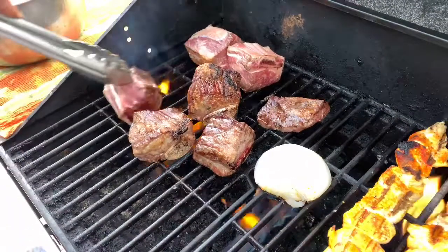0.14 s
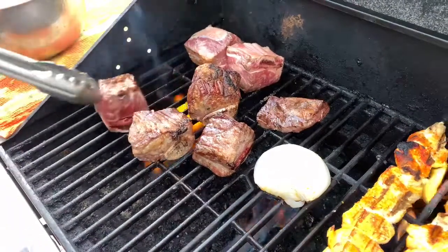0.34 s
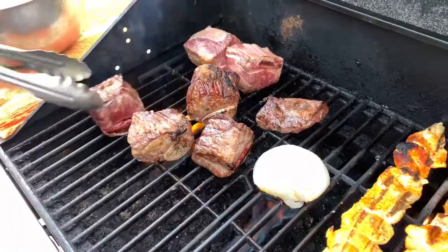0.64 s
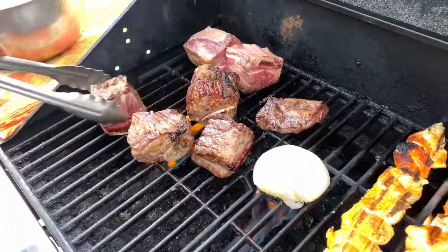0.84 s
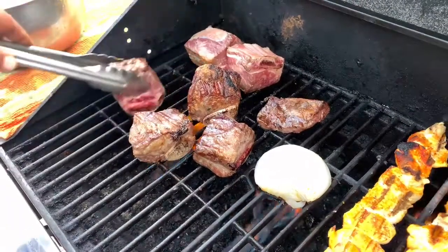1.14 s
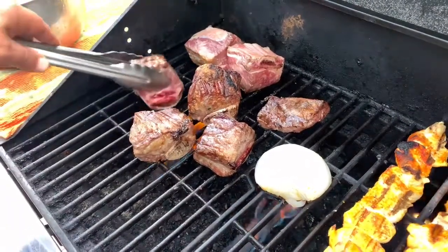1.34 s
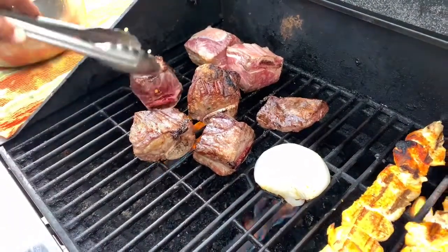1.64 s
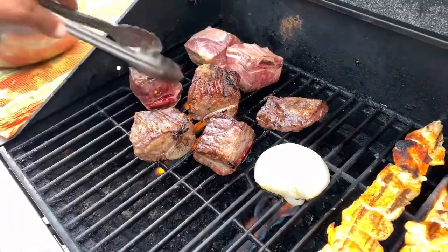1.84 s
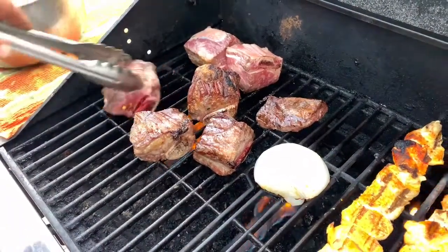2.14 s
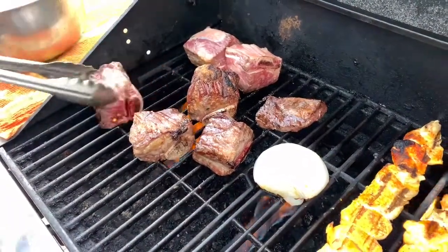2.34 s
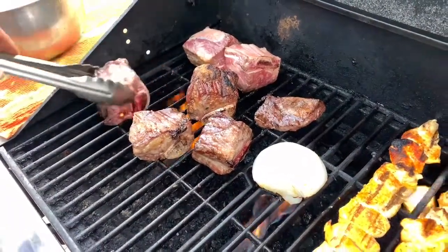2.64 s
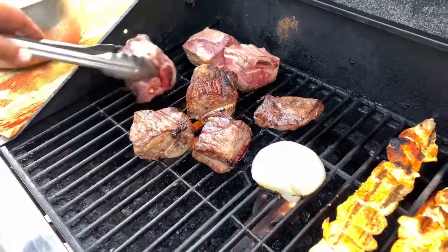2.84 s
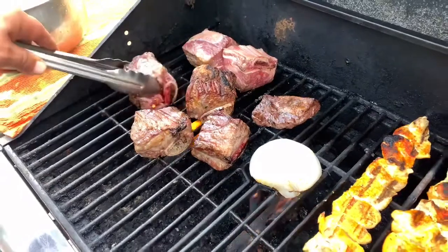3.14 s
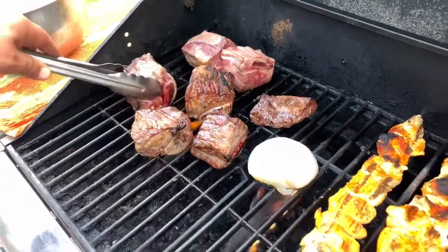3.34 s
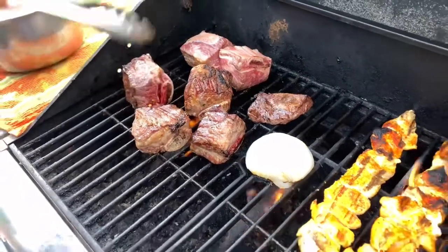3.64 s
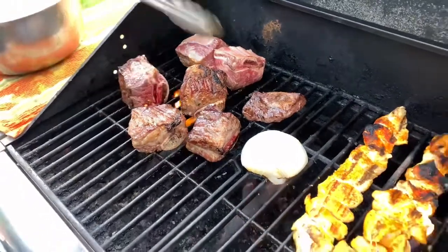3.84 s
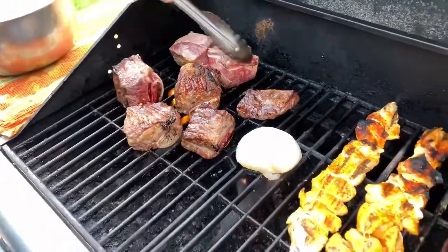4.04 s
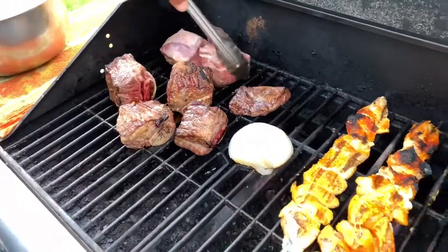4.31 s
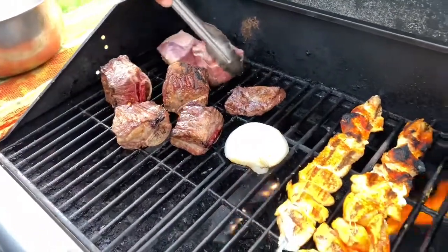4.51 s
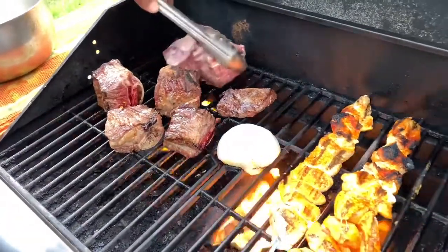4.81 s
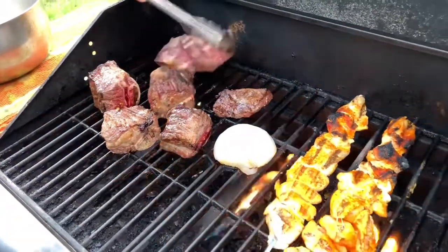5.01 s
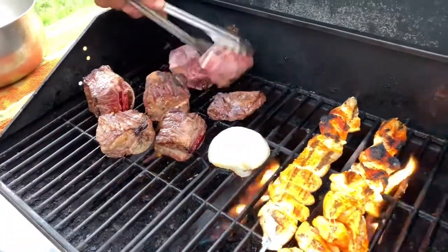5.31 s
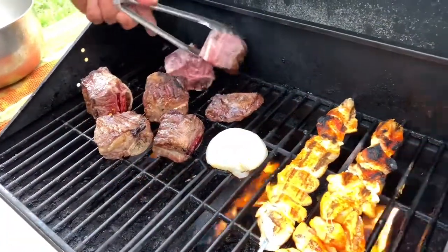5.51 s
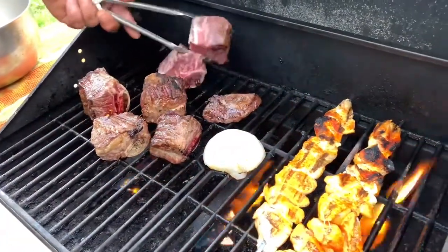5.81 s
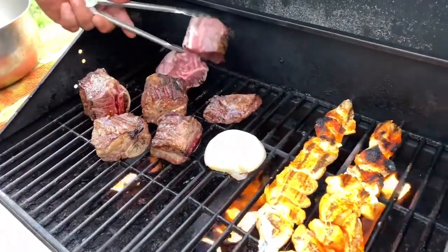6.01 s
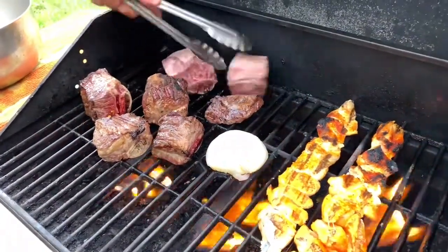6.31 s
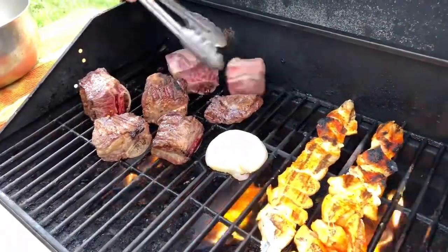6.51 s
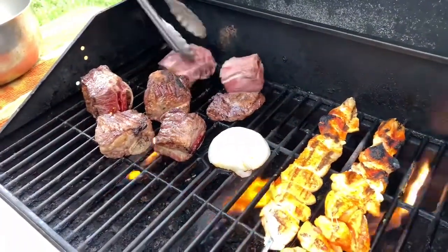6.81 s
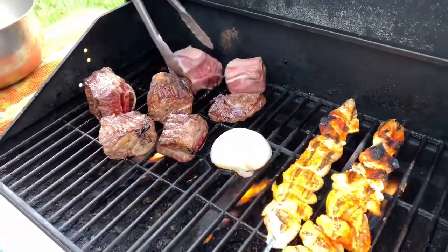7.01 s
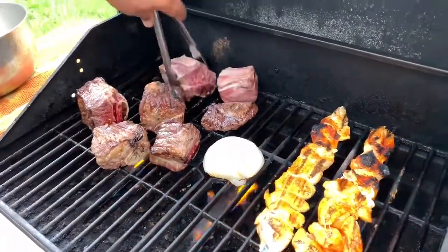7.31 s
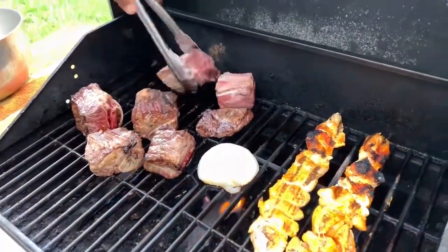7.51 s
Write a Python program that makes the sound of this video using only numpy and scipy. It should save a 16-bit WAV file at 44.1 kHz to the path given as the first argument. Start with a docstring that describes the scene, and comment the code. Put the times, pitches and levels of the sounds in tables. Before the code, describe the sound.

Meat sizzles and spits on an outdoor gas grill over a low burner roar, while metal tongs knock and scrape the grate and wind puffs.

```python
"""Meat sizzles on an outdoor gas grill, over a low hum and the burners' turbulent roar.
It opens with fizzing fat, spits, a knock and small puffs of wind; knocks and a few tong scrapes follow.
Past four seconds wind buffets the microphones and the crackle and low roar dip; then the crackle grows.
Blows of the tongs, scrapes, rubbing meat and gusts crowd the last three seconds, with loud spits at the end.
Fat is random bursts of noise, metal is struck resonance, and air is filtered noise and swept swings."""
import sys
import numpy as np
from scipy import signal
from scipy.fft import rfft, irfft, next_fast_len
from scipy.io import wavfile
from scipy.ndimage import uniform_filter1d, map_coordinates

SR = 44100
rng = np.random.default_rng(int(sys.argv[2]) if len(sys.argv) > 2 else 0)


def waveform_to_disk(signal):
    """Save audio, clipped to [-1, 1], as 16-bit WAV at the path in sys.argv[1]."""
    frames = np.transpose(np.atleast_2d(signal))
    scaled = np.clip(frames, -1, 1) * 32767
    samples = np.round(scaled).astype(np.int16)
    wavfile.write(sys.argv[1], SR, samples)


N = 337806

# Low hum: (frequency [Hz], level [dB])
HUM_TONES = [(64.8, -47.5), (118.5, -53)]
# Spectrum of the burners' rumble: (frequency [Hz], density [dB per Hz])
RUMBLE_SPECTRUM = [(15, -14), (28, -35), (48, 1.5), (85, -6.5), (140, -5), (200, -15.5), (320, -83),
                   (700, -39)]
# Spectrum of the burners' rush: (frequency [Hz], density [dB per Hz])
RUSH_SPECTRUM = [(80, -3.5), (170, 9.5), (265, 1), (350, -4), (430, -7), (500, -8.5), (620, -5.5),
                 (800, -16.5), (1200, -17.5), (2000, -22.5), (3200, -20), (8000, -39)]
# Likeness of the two microphone ports in diffuse sound: (frequency [Hz], coherence [-1 to 1])
PORT_COHERENCE = [(60, 0.95), (280, 1), (480, 0.95), (700, 0.4), (1000, 0.15), (1450, 0.34), (1900, 1),
                  (2300, 0.43), (3100, -0.62), (4000, 0.052), (4500, -0.81), (5400, -0.34), (7500, -.8)]
# Level difference of the ports, right minus left: (frequency [Hz], difference [dB])
RIGHT_OVER_LEFT = [(280, 0), (500, 0), (700, 3.5), (1200, 0.3), (1800, 2.5), (3000, .5), (5500, 7.5),
                   (8000, -3.5)]
# Phase by which the left port leads the right: (frequency [Hz], lead [rad])
LEFT_PHASE_LEAD = [(250, -0.22), (500, -0.87), (720, 2.74), (850, 0.52), (1050, 1.28), (1600, 0.088),
                   (1900, 0.63)]
# Brief dip in level: (time [s], share of the full depth in dB [0-1]); the end shares hold outward
DIP_SHAPE = [(4.315, 0.069), (4.39, 0.55), (4.47, 1), (4.69, 0.42), (4.73, 0.16)]
# Spells of breeze: (time [s], level [dB], length [s])
GUST_SPELLS = [(3.904, -37.5, 0.32), (4.289, -32.5, 0.096), (5.183, -38, 0.5), (6.447, -36.5, 0.47)]
# Strongest eddies at the microphones: (time of peak [s], level before a common trim [dB], mean pitch [Hz])
EDDIES = [(0.126, -28.5, 218.5), (0.222, -26.5, 171.5), (0.292, -30, 127.7), (0.455, -32.5, 118.5),
          (3.556, -29, 68), (4.312, -33, 139), (4.336, -29, 150), (4.354, -27, 240), (4.372, -20, 125.3),
          (4.389, -22, 112.2), (4.418, -23.5, 190), (4.457, -43, 428), (4.468, -29, 159.2),
          (4.677, -34, 140.6), (5.028, -28.5, 67), (5.255, -20, 134.7), (5.285, -27.5, 81.5),
          (5.421, -22, 67.5), (5.592, -21, 159.4), (5.605, -26, 80.2), (5.635, -27, 217.9), (5.65, -27, 79),
          (5.674, -30, 80.2), (6.373, -30, 183.3), (6.486, -27.5, 82.4), (6.594, -21, 104.3),
          (6.645, -21.5, 94), (6.717, -25.5, 99), (6.806, -24, 100.5), (6.894, -30, 84.2),
          (7.009, -29.5, 111), (7.055, -25, 112.3), (7.558, -26, 74.4)]
# Soft meat slides over the bars: (time [s], level [dB], length [s])
MEAT_RUBS = [(0.01, -51.5, 0.17), (2.47, -47, 0.15), (4.852, -46.5, 0.11), (5.08, -40, 0.13),
             (6.013, -45, 0.18), (6.25, -45.5, 0.12)]
# Ringing modes of grate and firebox: (frequency [Hz], relative level [dB], t60 [s])
GRATE_MODES = [(257.7, 5, 0.18), (476, 0, 0.092), (522, -8.5, 0.24), (691, 4, 0.12), (757, -1.5, 0.22),
               (785, -3, 0.41), (869, -3.5, 0.3), (935, -7, 0.24), (999, -2, 0.19), (1076, 0, 0.03),
               (1204, -2, 0.076), (1371, 3.5, 0.17), (1560, -4, 0.17), (1865, -1.5, 0.11), (2109, 7, 0.07),
               (2270, -4, 0.15)]
# Dense rattle of the sheet metal: (frequency [Hz], density [dB per Hz])
SHEET_SPECTRUM = [(100, 3), (250, 8.5), (350, -4), (500, 2), (1200, 5.5), (1680, 1.5), (2000, 0.5),
                  (2500, -8), (3300, -1), (5000, -7), (12000, -24)]
# Tongs or meat knock on the grate: (time [s], level [dB], time to let go [s], brightness [Hz],
# note of the touched bar [Hz], share of that bar [dB])
GRATE_KNOCKS = [(.122, -42.5, 0.0096, 2250, 1420, 5), (1.297, -35.5, 0.028, 1510, 513, -3),
                (1.345, -42.5, 0.024, 1200, 760, -2), (2.228, -38.5, 0.038, 324, 263, 18),
                (4.005, -45.5, 0.0033, 3370, 2150, -4), (4.708, -45, 0.056, 2050, 1660, -12),
                (5.109, -31, 0.027, 1170, 510, -1.5), (5.693, -35, 0.033, 2020, 1400, -23.5),
                (6.004, -41.5, 0.033, 1580, 790, -16), (6.366, -40, 0.016, 810, 248, 4),
                (6.831, -27, 0.032, 1820, 1150, -2), (7.188, -35.5, 0.047, 1370, 518.4, -13),
                (7.233, -34, 0.05, 2120, 1134, -2)]
# Tongs drag on the grate: (time [s], level before a common trim [dB], length [s], brightness [Hz],
# note of the touched bar [Hz], share of that bar [dB])
TONG_SCRAPES = [(0.008, -44, 0.01, 2380, 2190, -9), (.11, -49, 0.027, 2300, 2110, 6),
                (0.282, -46, 0.013, 900, 296, -2), (0.438, -49.5, 0.009, 1300, 1100, -3),
                (2.309, -48.5, 0.011, 2200, 2200, -7), (2.368, -48, 0.034, 2200, 2050, -8),
                (2.401, -40.5, 0.012, 2100, 1830, -5), (2.422, -37.5, 0.013, 2200, 750, -2),
                (2.461, -36.5, 0.026, 2270, 1834, -8), (2.503, -40, .006, 1100, 270, 1),
                (2.537, -50, 0.056, 1800, 1770, -8), (4.758, -43.5, 0.016, 1360, 900, -9),
                (4.931, -40.5, 0.012, 1100, 243, 8), (5.135, -43.5, 0.017, 1310, 1220, -3),
                (5.505, -57, 0.0074, 790, 493, 1), (6.006, -38.5, 0.073, 1490, 1550, -12),
                (6.111, -42, 0.017, 1700, 2320, -3), (6.135, -41.5, 0.02, 1350, 676, 7),
                (6.25, -35.5, 0.025, 1450, 960, -12), (6.34, -45, 0.008, 1200, 660, -24),
                (7.152, -45, 0.021, 1450, 533, -3), (7.264, -38.5, 0.012, 1450, 1430, -8)]
# Bare steel strikes or grazes a bar: (time [s], level [dB], rise [s], fade [s])
STEEL_CLINKS = [(.002, -45, 0.005, 0.037), (0.136, -57, .01, .02), (0.729, -42, 0.0055, 0.011),
                (1.301, -47, .003, 0.013), (2.409, -43, 0.024, .025), (2.452, -37, 0.03, 0.009),
                (6.02, -44, .015, 0.07), (6.176, -49, 0.0024, .005), (6.2, -44.5, .008, .015),
                (6.315, -52, .002, 0.0045), (7.231, -29.5, 0.0037, 0.014), (7.235, -31, 0.0013, .004)]
# Ringing modes of the tongs' arms: (frequency [Hz], relative level [dB], t60 [s])
STEEL_MODES = [(1770, 1, .06), (2120, -1, 0.064), (2500, -10, 0.044), (2610, -1, .06), (2970, -3, 0.24),
               (3090, 3, 0.064), (3200, 6, .06), (3830, 5, 0.084), (3810, -15, 0.041), (4270, 1, 0.035)]
# Grit of steel on iron: (frequency [Hz], density [dB per Hz])
GRIT_SPECTRUM = [(500, -22), (1900, 7.5), (2700, 3), (4500, -3.5), (6500, -0.5), (12000, 0)]
# Spectrum of the fizz: (frequency [Hz], density [dB per Hz])
FIZZ_SPECTRUM = [(3000, -29), (6000, -16.5), (7200, -8.5), (8300, 1.5), (9800, 3), (11600, -3),
                 (14000, 5.5), (15600, 1), (16200, -3.5)]
# Spectrum of the crackle: (frequency [Hz], density [dB per Hz])
CRACKLE_SPECTRUM = [(600, -2.5), (1500, 2), (2100, 0.5), (2700, 5), (3600, 0), (4600, 4), (5600, -1),
                    (7000, 10), (9000, -10.5), (15000, -32)]
# Juice runs onto the hot bars: (time [s], level before the fizz trim [dB], hold [s])
FRYING_FLARES = [(-.04, -39.5, 0.2), (0.18, -43, 0.36), (1.753, -46.5, 0.066), (2.373, -49, 0.19),
                 (3.027, -50.5, 0.18), (3.787, -48.5, 0.44), (4.242, -43, 0.081), (4.7, -43, 0.014),
                 (5.144, -38.5, 0.85), (6.713, -47, 0.54), (7.15, -44.5, 0.22)]
# Loud spits of fat: (time [s], level before a common trim [dB], crackle against fizz [dB])
LOUD_SPITS = [(.058, -25.5, -8), (.492, -33, -3), (.603, -24.5, -10), (.879, -33.5, -4), (1.036, -25, -9),
              (1.753, -30, -18), (1.767, -32, -18), (2.682, -34, -12), (2.816, -29, -11), (3.858, -37, -3),
              (3.917, -32, -7), (4.142, -26, -9), (4.151, -33, -9), (5.143, -26.5, -7), (5.179, -30, -3),
              (5.229, -19.5, -11), (5.389, -35, -8), (5.513, -26, -22), (5.873, -26, -4), (6.175, -32, -1),
              (6.554, -37, 7.5), (6.969, -35.5, 6), (7.177, -25, -13), (7.235, -18.5, -16),
              (7.348, -24, -9), (7.418, -22.5, -14)]
# Echo paths from the back wall and the lid: (mean delay [s])
WALL_ECHOES = [0.000903, .0023]

PORT_LAG_MS = 0.215  # the left port hears the grate this much later
EDGE_HZ = 15900
DIP_CRACKLE_DB, DIP_LOW_DB = -20, -12  # full depths of the dip
HOLLOW_WIDTH_HZ = 23.5  # half width of the firebox resonances under the flames

GUST_RISE_S, GUST_FADE_S = 0.052, 0.072
# A gust of the usual level reaches this high; a stronger one reaches higher, in dB of reach per dB
GUST_USUAL_DB, GUST_REACH_HZ, REACH_FOLLOWS = -35.5, 100, 0.65
PUFF_SWINGS = 1.07  # pressure swings from an eddy's peak to its edge: small eddies pass quickly

RUB_RISE_S, RUB_FADE_S = 0.016, 0.16
SCRAPE_RISE_S, SCRAPE_FADE_S = 0.0032, 0.042
KNOCK_RISE_S = 0.0017  # time to full force
CHATTER_PER_S, CHATTER_UNEVEN, CHATTER_SAG_DB = 85, 0.3, -8.5  # bounces of the grate after a knock
TICK_DB, TICK_S, TICK_BRIGHTER = -7, 0.0046, 0.68  # first touch; the last scales the blow's brightness

SIMMER_DB, FLARE_RISE_S, FLARE_FADE_S = -51.5, 0.025, 0.034  # steady frying; shape of every flare
AFTER_DB, AFTER_FADE_S = -3.5, 2.54  # the last of the juice cooks off slowly
CRACKLE_DB, CRACKLE_FOLLOWS = -56, 0.77  # crackle at a simmer, and its dB per dB of frying
FLAME_UP_S, FLAME_UP_RISE_S, FLAME_UP_DB = 4.86, 0.36, 3.5  # dripping fat catches fire: more crackle
POP_DB, POP_FOLLOWS, POP_SPREAD_DB = -63.5, 0.73, 1  # level at a simmer, dB per dB, spread in size
POPS_PER_S, POP_LOW_HZ, POP_HIGH_HZ = 380, 2120, 9360
POP_CYCLES = 2.5  # decay constant of a pop in its own cycles
POP_DRIFT_DB = 1.5  # random level drift, independent for each pop pitch
SPIT_S = 0.0059  # time constant of a spurt
SMALL_SPITS_PER_S, SMALL_SPIT_DB, SMALL_SPIT_SPREAD_DB = 22, 5, 8  # dB above the frying, and plus or minus


def amp(db):
    """Level: converts decibels to an amplitude gain."""
    return 10 ** (np.asarray(db) / 20)


def unit(x):
    """Normalization: scales to an rms of one."""
    return x / np.sqrt(np.mean(x ** 2) + 1e-20)


def peaked(pair):
    """Short-time power: scales a stereo sound so that its loudest moment has an rms of one."""
    return pair / np.sqrt(uniform_filter1d((pair ** 2).mean(0), size=900).max())


def read(points, hz):
    """Interpolation: reads a (frequency, value) table on a log-frequency axis."""
    f, value = np.transpose(points)
    return np.interp(np.log(hz + 1), np.log(f), value)


def filtered(x, response):
    """Linear filtering: multiplies the spectrum by a function of frequency."""
    size = next_fast_len(x.shape[-1] + 512)
    hz = np.fft.rfftfreq(size, 1 / SR)
    return irfft(rfft(x, size) * response(hz), size)[..., :x.shape[-1]]


def colour(x, spectrum):
    """Spectral shaping: applies a (frequency, dB) curve and gives an rms of one."""
    return unit(filtered(x, lambda hz: amp(read(spectrum, hz))))


def drift(rate):
    """Low-pass noise: slow random motion of rms one, up to about `rate` hertz."""
    coarse = rng.standard_normal(N // 100 + 1)
    hz = np.fft.rfftfreq(len(coarse), N / SR / len(coarse))
    slow = irfft(rfft(coarse) / (1 + (hz / rate) ** 4))
    return np.interp(np.arange(N), np.linspace(0, N, len(slow)), unit(slow))


def envelope(t, rise, length, fade):
    """Growth and decay: rises in a straight line, holds until `length`, then decays exponentially."""
    return np.clip(t / rise, 0, 1) * np.exp(-np.maximum(t - length, 0) / fade)


def dip(depth_db):
    """Amplitude modulation: gain of the brief dip in level."""
    return amp(depth_db * np.interp(np.arange(N) / SR, *np.transpose(DIP_SHAPE)))


def add(mix, s, sound):
    """Superposition: adds a stereo sound to the mix at time s."""
    part = mix[:, max(round(s * SR), 0):][:, :sound.shape[1]]
    part += sound[:, :part.shape[1]]


def direct(x, lag_ms=PORT_LAG_MS):
    """Arrival-time difference: sound from the grate reaches the right port first."""
    left = filtered(x, lambda hz: np.exp(-2j * np.pi * hz * lag_ms / 1000))
    return np.array([left, x])


def diffuse(pair):
    """Spatial coherence: mixes unrelated signals into a port pair with set likeness, balance and phase."""
    size = next_fast_len(pair.shape[1])
    hz = np.fft.rfftfreq(size, 1 / SR)
    a, b = rfft(pair, size)
    alike = np.clip(read(PORT_COHERENCE, hz), -1, 1)
    mid, side = a * np.sqrt((1 + alike) / 2), b * np.sqrt((1 - alike) / 2)
    # Each port takes half of the level and phase difference
    lean = amp(read(RIGHT_OVER_LEFT, hz) / 2)
    lead = np.exp(0.5j * read(LEFT_PHASE_LEAD, hz))
    ports = np.array([(mid + side) * lead / lean, (mid - side) * lean / lead])
    return irfft(ports, size)[:, :pair.shape[1]]


def off_the_walls(pair, wall_db=-7.0, sway=0.072):
    """Reflection: two near steel walls return echoes whose paths drift as the microphones sway."""
    n, out = np.arange(N), pair
    for delay_s in WALL_ECHOES:
        late = n - delay_s * SR * (1 + sway * drift(rate=1.46))
        echo = np.array([map_coordinates(port, [late], order=3) for port in pair])
        out = out + amp(wall_db) * echo
    return out


def ringing(table, t, detune, uneven_db):
    """Modal decay: at each touch the modes' pitch and share vary alike at both ports; phases differ by port."""
    hz, db, t60 = np.transpose(table)[:, :, None]
    shift, share = rng.standard_normal((2, len(table), 1))
    decay = amp(db + uneven_db * share - 60 * t / t60)
    modes = decay * np.exp(2j * np.pi * hz * (1 + detune * shift) * t)
    phases = np.exp(2j * np.pi * rng.random((2, len(table))))
    return (phases @ modes).imag


def hum(waver_hz=1.4, swell_db=3.5):
    """Frequency modulation: two low tones waver in pitch and level."""
    out = 0
    for hz, db in HUM_TONES:
        level = amp(db + swell_db * drift(rate=0.21))
        phase = 2 * np.pi * np.cumsum(hz + waver_hz * drift(rate=6.6)) / SR
        out = out + level * unit(np.sin(phase))
    return out


def burners(flutter_db=2.5, rumble_db=-45.0, rush_db=-48, flicker_db=1.5, hollow_db=-57):
    """Turbulent combustion: fluttering rumble and steadier rush, which excites firebox resonances faintly."""
    flames = diffuse(rng.standard_normal((2, N)))
    rumble = colour(flames, RUMBLE_SPECTRUM) * amp(rumble_db + flutter_db * drift(rate=2.5))
    rush = colour(diffuse(rng.standard_normal((2, N))), RUSH_SPECTRUM)

    def resonances(hz):
        """Resonance: sums a peak at each grate mode, growing with frequency."""
        return sum(hz / (1 + ((hz - f) / HOLLOW_WIDTH_HZ) ** 2) for f, db, t60 in GRATE_MODES)

    hollow = unit(filtered(rush, resonances))
    flicker = amp(flicker_db * drift(rate=16.4))
    return rumble + (amp(rush_db) * rush + amp(hollow_db) * hollow) * flicker


def breeze(low_hz=40, slope=6.8):
    """Turbulent pressure: each spell of breeze buffets the microphones with low-frequency noise."""
    out, t = np.zeros((2, N)), np.arange(N) / SR
    air = diffuse(rng.standard_normal((2, N)))
    for s, db, length in GUST_SPELLS:
        reach = GUST_REACH_HZ * amp(REACH_FOLLOWS * (db - GUST_USUAL_DB))
        buffet = filtered(air, lambda hz: (1 - 1 / (1 + (hz / low_hz) ** 4)) / (1 + (hz / reach) ** slope))
        out += amp(db) * envelope(t - s, GUST_RISE_S, length, GUST_FADE_S) * unit(buffet)
    return out


def wind(level_db=-1, wander=0.33, apart=0.027, ragged_db=-13, ragged_reach=1.6):
    """Eddy convection: a few uneven pressure swings pass, with finer turbulence different at each port."""
    out, t = np.zeros((2, N)), np.arange(-4096, 4096) / SR
    for s, db, hz in EDDIES:
        unevenness = unit(filtered(rng.standard_normal(len(t)), lambda f: 1 / (1 + (f / hz) ** 4)))
        pitch = hz * np.exp(wander * unevenness - wander ** 2 / 2)
        phase = 2 * np.pi * (np.cumsum(pitch) / SR + rng.random())
        swings = np.sin(phase + apart * rng.standard_normal((2, 1)))
        noise = rng.standard_normal((2, len(t)))
        ragged = unit(filtered(noise, lambda f: 1 / (1 + (f / (ragged_reach * hz)) ** 3)))
        passing = np.exp(-(t * hz / PUFF_SWINGS) ** 2)
        add(out, s + t[0], amp(db + level_db) * passing * (swings + amp(ragged_db) * ragged))
    return out


def rubs(low_hz=170, high_hz=340, slope=2.44, stick_db=5.0):
    """Stick-slip friction: meat slides on the bars as unevenly modulated, dull band-limited noise."""
    t = np.arange(N) / SR
    force = sum(amp(db) * envelope(t - s, RUB_RISE_S, length, RUB_FADE_S) for s, db, length in MEAT_RUBS)
    noise = diffuse(rng.standard_normal((2, N)))
    rub = filtered(noise, lambda hz: (1 - 1 / (1 + (hz / low_hz) ** 4)) / (1 + (hz / high_hz) ** slope))
    return force * unit(rub * amp(stick_db * drift(rate=20)))


def firebox(t, sheet_t60=0.21, modes_db=3.0):
    """Impulse response: a tap rings the grate modes over a dense, short rattle of sheet metal."""
    bars = ringing(GRATE_MODES, t, detune=0.01, uneven_db=1.0)
    sheet = colour(rng.standard_normal((2, len(t))), SHEET_SPECTRUM) * amp(-60 * t / sheet_t60)
    return unit(sheet) + amp(modes_db) * unit(bars)


def contact(force, bright_hz, bar_hz, bar_db, blow_db, jerky, bar_width_hz=60, bass_edge=0.054,
            dull_share=0.49, slope=2.6):
    """Contact excitation: tiny slips shake the grill and one bar; the sound dulls as the force eases."""
    t = np.arange(len(force)) / SR
    slips = force * rng.standard_normal(len(t)) * rng.exponential(1, len(t)) ** jerky
    ring = signal.fftconvolve(slips[None], firebox(t), axes=1)[:, :len(t)]
    blow = colour(force * rng.standard_normal((2, len(t))), SHEET_SPECTRUM)
    shake = unit(ring) + amp(blow_db) * blow

    def softened(edge_hz):
        """Low-pass filtering: takes off the treble above the edge."""
        return filtered(shake, lambda hz: 1 / np.hypot(1, (hz / edge_hz) ** slope))

    firm = np.sqrt(force / force.max())
    body = firm * softened(bright_hz) + (1 - firm) * softened(dull_share * bright_hz)
    # A brighter touch has less bass
    bass_hz = min(bass_edge * bright_hz, SR / 4)
    body = signal.lfilter(*signal.butter(1, bass_hz, "high", fs=SR), body)
    bar = signal.lfilter(*signal.iirpeak(bar_hz, bar_hz / bar_width_hz, fs=SR), blow)
    return peaked(diffuse(unit(body) + amp(bar_db) * unit(bar)))


def chatter(t):
    """Repeated impact: the grate bounces on its ledge, its force jumping at each bounce and then sagging."""
    pace = CHATTER_PER_S * np.exp(CHATTER_UNEVEN * drift(rate=60)[:len(t)])
    bounces = np.cumsum(pace) / SR
    return amp(CHATTER_SAG_DB * (bounces % 1))


def tongs(scrape_db=0.4, catch_db=3.0):
    """Impact and friction: a knock ticks, hits and lets go; a scrape swells, catches and trails off."""
    out, t = np.zeros((2, N)), np.arange(16384) / SR
    for s, db, fade, bright_hz, *bar in GRATE_KNOCKS:
        force = envelope(t, KNOCK_RISE_S, KNOCK_RISE_S, fade) * chatter(t)
        tick = contact(np.exp(-t / TICK_S), TICK_BRIGHTER * bright_hz, bright_hz,
                       bar_db=-2.5, blow_db=-1.5, jerky=1.3)
        hit = contact(force, bright_hz, *bar, blow_db=-5.0, jerky=1.86)
        add(out, s, amp(db) * (hit + amp(TICK_DB) * tick))
    for s, db, length, *tone in TONG_SCRAPES:
        catches = amp(catch_db * drift(rate=35)[:len(t)])
        force = envelope(t, SCRAPE_RISE_S, length, SCRAPE_FADE_S) * catches
        add(out, s, amp(db + scrape_db) * contact(force, *tone, blow_db=-12.5, jerky=1.48))
    return out


def clinks(grit_db=6.5):
    """Forced vibration: gritty slips of bare steel on a bar set the arms of the tongs ringing."""
    out, t = np.zeros((2, N)), np.arange(16384) / SR
    for s, db, rise, fade in STEEL_CLINKS:
        slips = envelope(t, rise, rise, fade) * rng.standard_normal((2, len(t)))
        arms = ringing(STEEL_MODES, t, detune=0.0028, uneven_db=3.0)
        ring = signal.fftconvolve(slips, arms, axes=1)[:, :len(t)]
        add(out, s, amp(db) * peaked(unit(ring) + amp(grit_db) * colour(slips, GRIT_SPECTRUM)))
    return out


def frying():
    """Addition of powers: strength of the frying in dB, a steady simmer plus flares that cook off slowly."""
    t, power = np.arange(N) / SR, amp(SIMMER_DB) ** 2
    for s, db, hold in FRYING_FLARES:
        flare = envelope(t - s, FLARE_RISE_S, hold, FLARE_FADE_S)
        after = amp(AFTER_DB) * envelope(t - s, FLARE_RISE_S, hold, AFTER_FADE_S)
        power = power + amp(db) ** 2 * (flare ** 2 + after ** 2)
    return 10 * np.log10(power)


def pops(strength_db, count=14):
    """Transient oscillation: larger fat bubbles pop as short ticks, each at one of `count` pitches."""
    out, t = np.zeros((2, N)), np.arange(512) / SR
    for hz in np.geomspace(POP_LOW_HZ, POP_HIGH_HZ, count):
        when, size = rng.random((2, int(POPS_PER_S * N / SR / count)))
        strength = amp(POP_SPREAD_DB * np.minimum(-np.log(size), 4))
        train = np.bincount((when * N).astype(int), strength, N)
        train = train * amp(POP_DRIFT_DB * drift(rate=11.5))
        # The envelope runs in cycles of the tone
        tick = np.sin(2 * np.pi * (hz * t + rng.random((2, 1)))) * envelope(t * hz, 0.46, 0.5, POP_CYCLES)
        out += signal.oaconvolve(train[None], unit(tick), axes=1)[:, :N]
    level = amp(POP_DB + POP_FOLLOWS * (strength_db - SIMMER_DB))
    return unit(out) * level * dip(DIP_CRACKLE_DB)


def spits(strength_db, level_db=-4.0, small_crackle_db=-10, echo_db=-15, echo_s=0.003):
    """Jet noise: a large drop of fat snaps open and spurts; a short scatter from the lid goes with it."""
    out, t, low_gain = np.zeros((2, N)), np.arange(2048) / SR, dip(DIP_CRACKLE_DB)
    small = []
    for i in np.flatnonzero(rng.random(N) < SMALL_SPITS_PER_S / SR):
        above_db = SMALL_SPIT_DB + SMALL_SPIT_SPREAD_DB * (2 * rng.random() - 1)
        small.append((i / SR, strength_db[i] + above_db, small_crackle_db))
    for s, db, crackle_db in list(LOUD_SPITS) + small:
        noise = rng.standard_normal((4, len(t)))
        crackle = amp(crackle_db) * low_gain[int(s * SR)] * colour(noise[1], CRACKLE_SPECTRUM)
        jet = colour(noise[0], FIZZ_SPECTRUM) + crackle
        snap = direct(jet * np.exp(-(t / SPIT_S) ** 2))
        scatter = colour(noise[2:], FIZZ_SPECTRUM) * np.exp(-t / echo_s)
        add(out, s, amp(db + level_db) * (snap + amp(echo_db) * scatter))
    return out


def bubbles(count, spread_db, burst_s, steam):
    """Shot noise: random, mostly small bubbles let out short jets over a steady hiss of steam."""
    when, size = rng.random((count, 2)).T
    energy = amp(spread_db * np.minimum(-np.log(size), 5)) ** 2
    bursts = np.bincount((when * N).astype(int), energy, N)
    power = signal.lfilter([1], [1, -np.exp(-1 / (burst_s * SR))], bursts)
    return unit(np.sqrt(power / power.mean() + steam) * rng.standard_normal(N))


def sizzle(strength_db, lid_db=-6, sputter_db=1.02, fizz_db=1.15, splutter_db=2.3):
    """Direct and scattered sound: meat fizzes under the lid, and coarser crackle comes from all round."""
    sputter = sputter_db * drift(rate=15.0)
    meat = direct(bubbles(count=11000, spread_db=1.5, burst_s=0.00056, steam=0.97))
    fizz = colour(meat + amp(lid_db) * rng.standard_normal((2, N)), FIZZ_SPECTRUM)
    coarse = np.array([bubbles(count=7000, spread_db=2.5, burst_s=0.0025, steam=0.72) for port in range(2)])
    crackle = colour(off_the_walls(diffuse(coarse) + amp(-2.0) * meat), CRACKLE_SPECTRUM)
    flame_up = np.clip((np.arange(N) / SR - FLAME_UP_S) / FLAME_UP_RISE_S, 0, 1)
    crackle_db = CRACKLE_DB + CRACKLE_FOLLOWS * (strength_db - SIMMER_DB)
    crackle_db = crackle_db + splutter_db * drift(rate=22) + FLAME_UP_DB * flame_up
    fizz = fizz * amp(strength_db + sputter + fizz_db)
    return fizz + crackle * amp(crackle_db + sputter) * dip(DIP_CRACKLE_DB)


def scene():
    """Superposition: everything that sounds at the grill, background first."""
    background = (hum() + burners()) * dip(DIP_LOW_DB) + breeze() + wind()
    handling = rubs() + tongs() + clinks()
    strength_db = frying()
    fat = pops(strength_db) + spits(strength_db) + sizzle(strength_db)
    return background + handling + fat


def record(dry):
    """Band limitation: a steep linear-phase low-pass filter sets the recorder's upper edge."""
    lowpass = signal.firwin(511, EDGE_HZ, window=("kaiser", 9), fs=SR)
    return signal.oaconvolve(dry, lowpass[None], "same")


dry = scene()
out = record(dry)
waveform_to_disk(out)
```